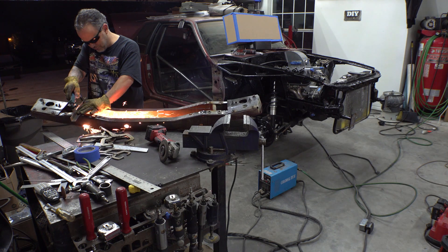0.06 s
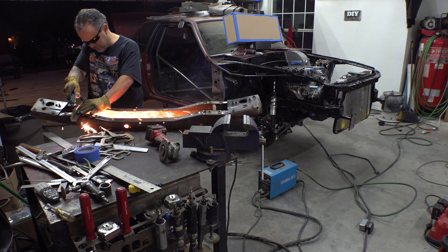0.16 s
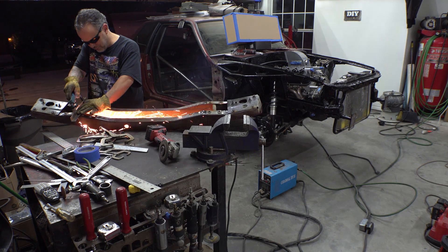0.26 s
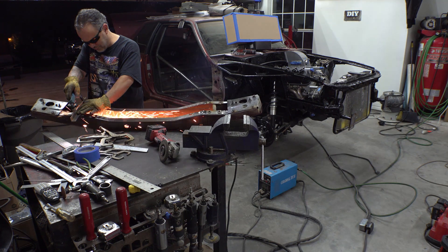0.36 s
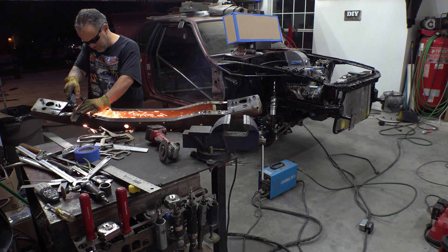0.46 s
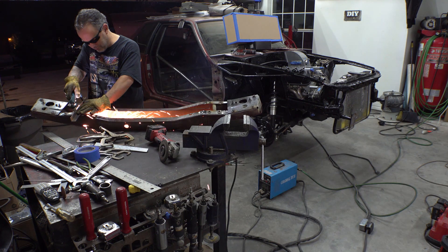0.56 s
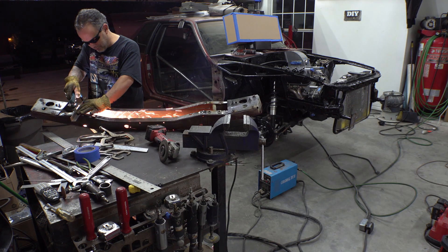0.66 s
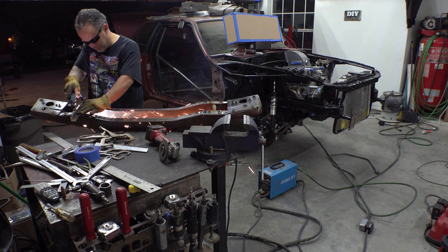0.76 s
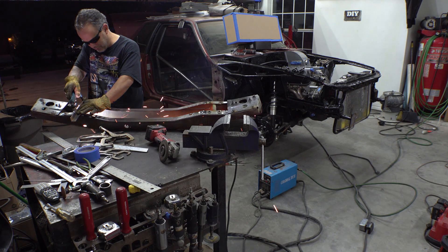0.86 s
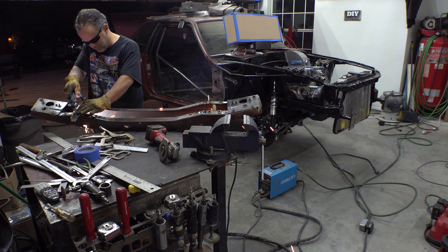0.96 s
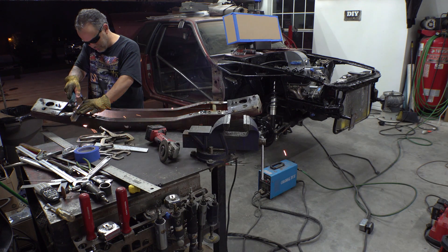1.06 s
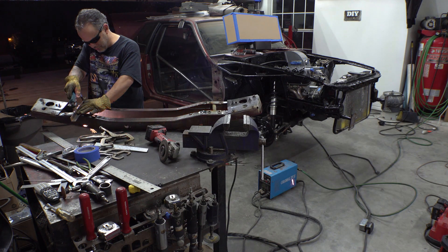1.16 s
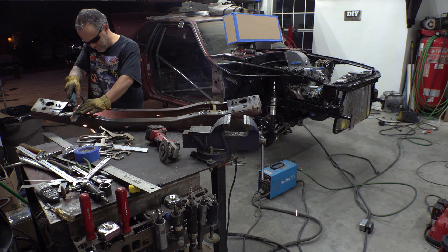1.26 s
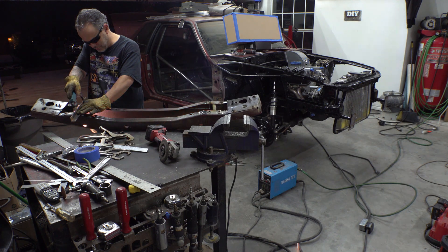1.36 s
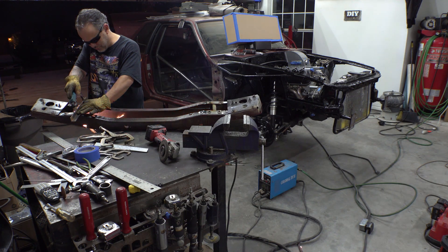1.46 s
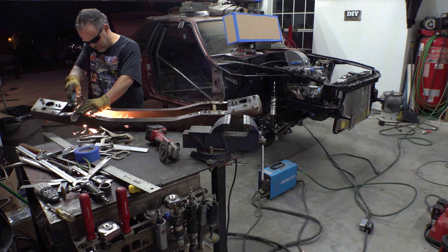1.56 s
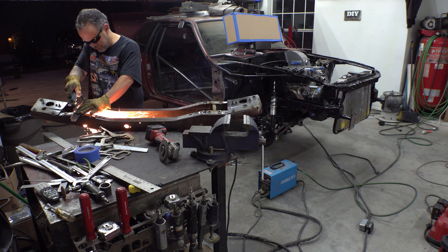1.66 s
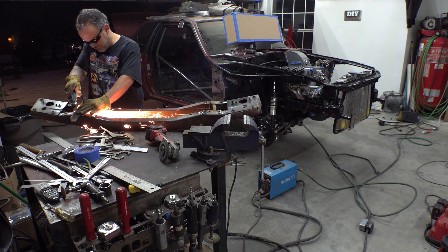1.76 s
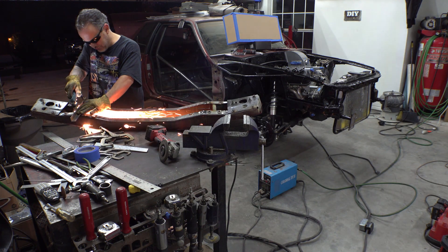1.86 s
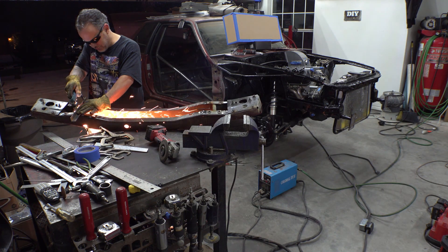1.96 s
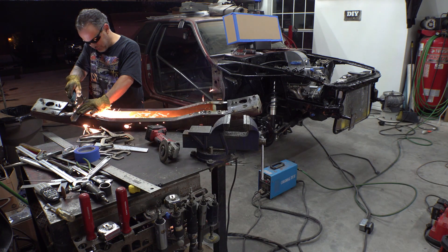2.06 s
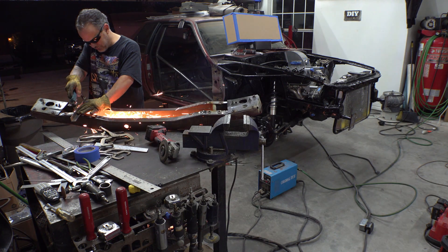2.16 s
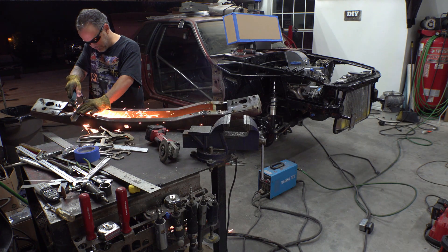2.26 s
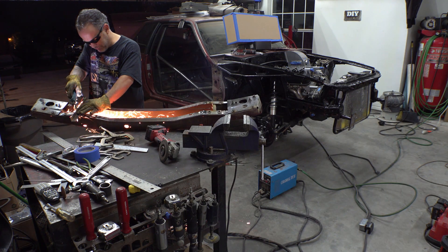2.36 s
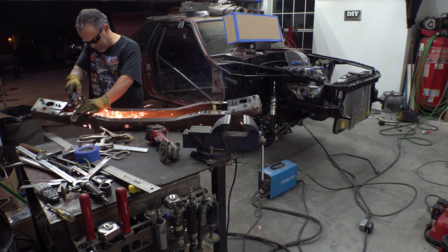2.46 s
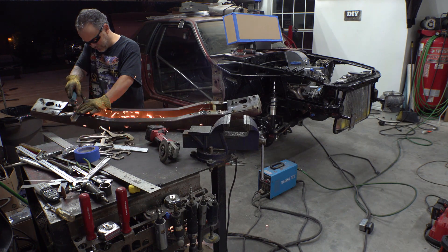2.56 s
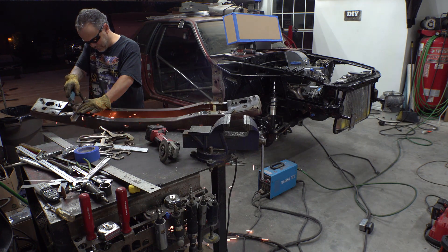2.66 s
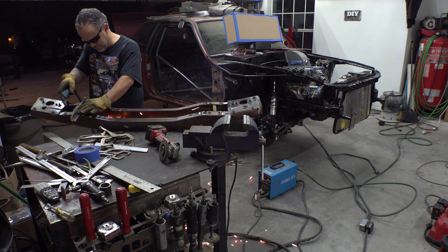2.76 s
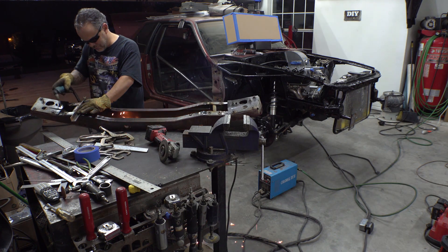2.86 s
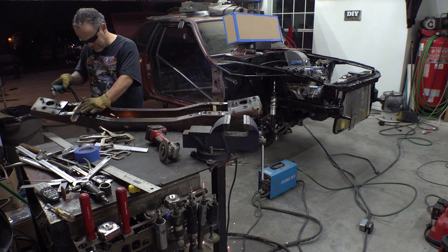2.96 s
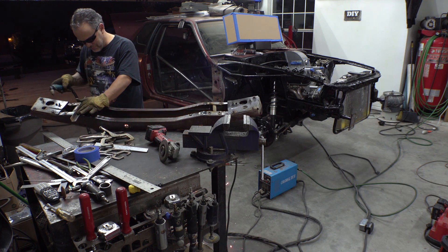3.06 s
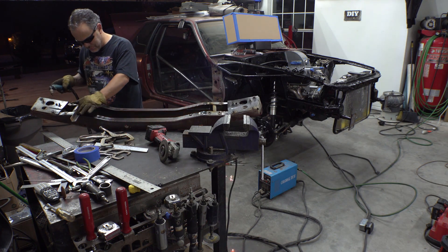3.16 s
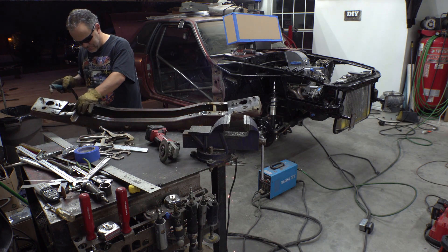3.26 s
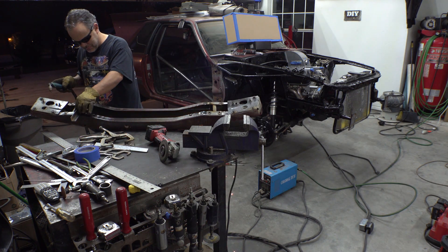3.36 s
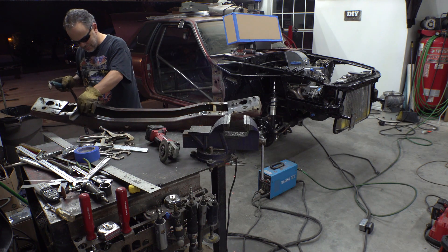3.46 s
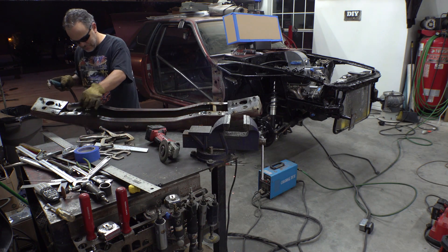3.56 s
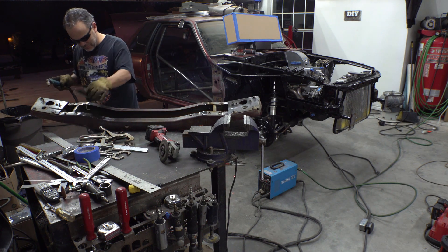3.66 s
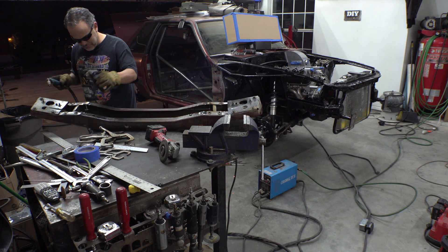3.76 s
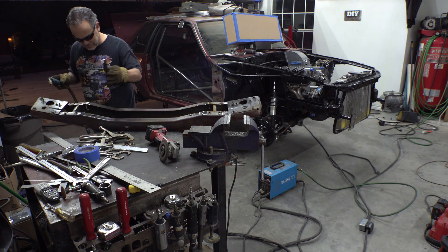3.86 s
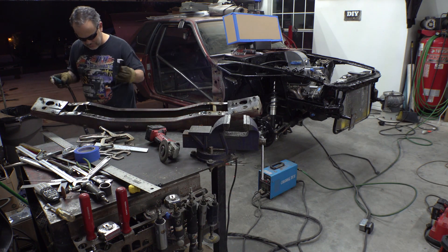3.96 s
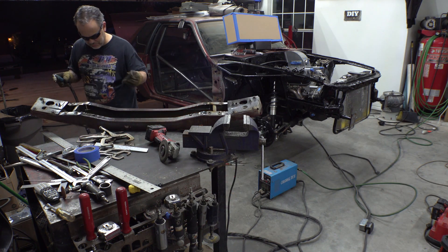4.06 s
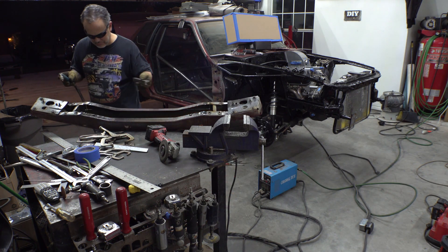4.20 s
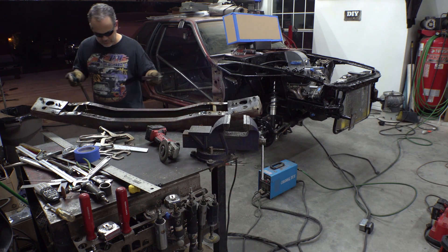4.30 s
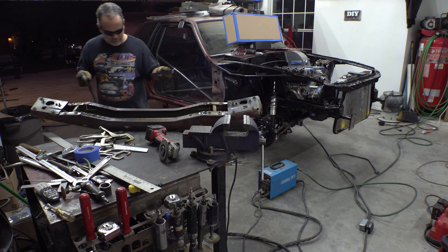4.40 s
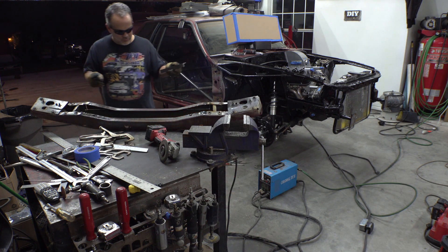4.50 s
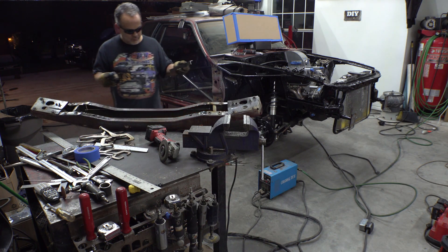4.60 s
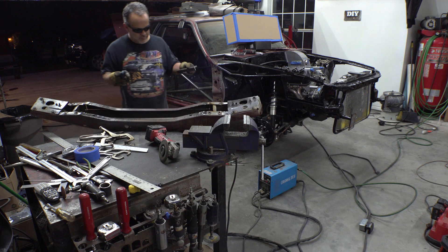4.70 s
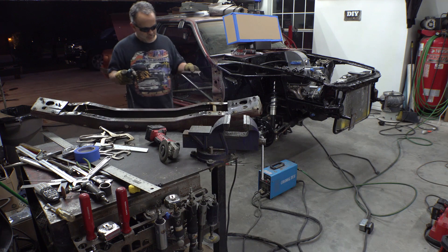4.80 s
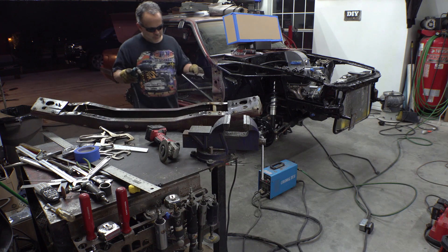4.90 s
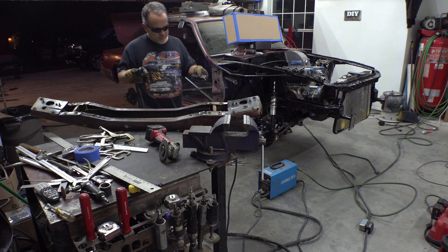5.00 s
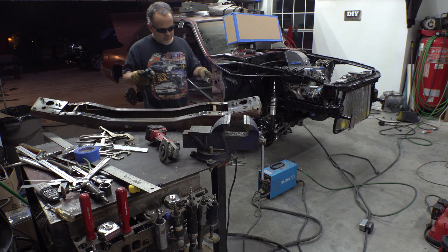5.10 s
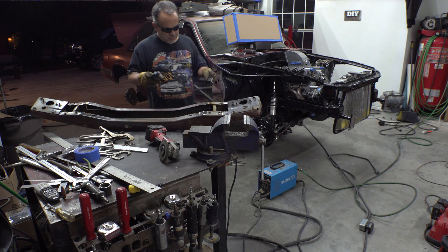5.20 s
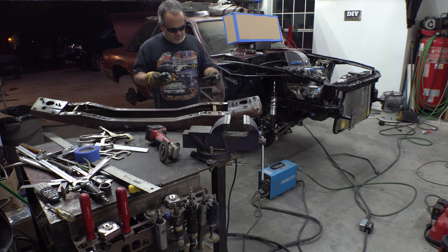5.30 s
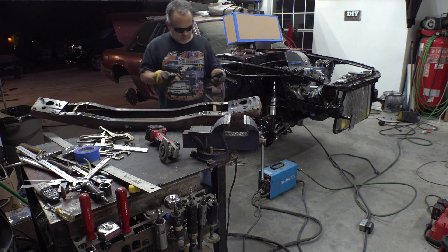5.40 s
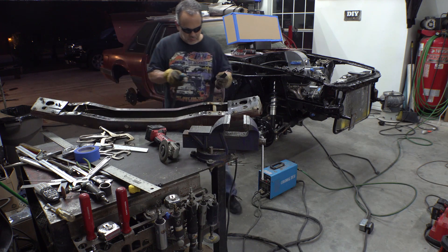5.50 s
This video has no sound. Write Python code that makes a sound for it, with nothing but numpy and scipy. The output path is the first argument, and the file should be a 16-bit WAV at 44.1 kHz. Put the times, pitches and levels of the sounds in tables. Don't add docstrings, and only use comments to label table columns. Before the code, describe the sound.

Bright, whistling hiss of a plasma cutter with sputtering slag stops dead, leaving rushing air, clinks and dragging steel in a humming garage.

```python
import sys
import numpy as np
from scipy import signal
from scipy.fft import rfft, irfft, next_fast_len
from scipy.io import wavfile
from scipy.ndimage import map_coordinates

SR = 44100
rng = np.random.default_rng(int(sys.argv[2]) if len(sys.argv) > 2 else 0)


def gain_from_db(level_db):
    decades = np.asarray(level_db, float) / 20
    return 10 ** decades


def unload_audio(sound):
    columns = np.transpose(np.atleast_2d(sound))
    steps = np.round(np.clip(columns, -1, 1) * 32767)
    wavfile.write(sys.argv[1], SR, steps.astype(np.int16))


N = 244314
ARC_OFF_S = 2.598


def seconds():
    return np.arange(N) / SR


def in_time(rows):
    s, *columns = np.transpose(rows)
    return [np.interp(seconds(), s, column) for column in columns]


def switch(on_s, fade_s):
    return np.clip((seconds() - on_s) / fade_s + 0.5, 0, 1)


def swell(at_s, rise_s, fall_s):
    late = seconds() - at_s
    return np.exp(np.minimum(late / rise_s, -late / fall_s))


def rms_one(x):
    return x / np.sqrt(np.mean(np.abs(x) ** 2) + 1e-20)


def drift(rate_hz):
    pole = np.exp(-40 * np.pi * rate_hz / SR)
    noise = rng.standard_normal(N // 20 + 3002)
    slow = signal.lfilter([1], [1, -2 * pole, pole * pole], noise)[3000:]
    return np.interp(np.arange(N) / 20, np.arange(len(slow)), rms_one(slow))


def turbulence(spectrum, patchy_db, rate, count=4):
    size = next_fast_len(N)
    points = np.array(spectrum)
    hz = np.maximum(np.arange(size // 2 + 1) * SR / size, 1)
    colour_db = np.interp(np.log(hz), np.log(points[:, 0]), points[:, 1])
    noise = irfft(rfft(rng.standard_normal(size)) * gain_from_db(colour_db), size)[:N]
    hz, s, cells = signal.stft(noise, SR, nperseg=512)
    knots = rng.standard_normal((11 * count, 400))
    knots += 0.087 * rng.standard_normal(400)
    place = np.meshgrid(count * np.log2(1 + hz / 20), 2 * rate * s, indexing="ij")
    patches = map_coordinates(knots, place, order=2, mode="mirror")
    return rms_one(signal.istft(cells * gain_from_db(patchy_db * patches), SR, nperseg=512)[1][:N])


def resonate(x, hz, width_hz):
    r = np.exp(-np.pi * width_hz / SR)
    passing = np.array([1, 0, -1]) * (1 - r * r) / 2
    return signal.lfilter(passing, [1, -2 * r * np.cos(2 * np.pi * hz / SR), r * r], x)


def whistle(hz, level_db, width_hz):
    pole = np.exp(-np.pi * width_hz / SR)
    noise = [1, 1j] @ rng.standard_normal((2, len(hz)))
    flutter = signal.lfilter([1], [1, -2 * pole, pole * pole], noise)
    turning = np.exp(2j * np.pi * np.cumsum(hz) / SR)
    return gain_from_db(level_db) * rms_one(np.real(flutter * turning))


# start_s, jet level_db, lift off the steel [0-1], edge tone level_db, pitch shift [%]
TORCH = [
    (0.0, -28, 0.2, -46, -0.2),
    (0.58, -29, 0, -32, -1.3),
    (0.82, -28, .8, -31.5, 1.2),
    (1.05, -29.5, .95, -29, 0.1),
    (1.16, -30.5, 0.03, -30.5, 0.9),
    (1.62, -31, 0.05, -28, -2),
    (1.95, -31, 0.05, -26, 4),
    (2.22, -30, 0.01, -27.5, 1.5),
    (2.6, -29.5, .02, -34, -3.0),
]
# pitch_hz, rise at full lift [Hz], change at full lift [dB], width_hz, level_db
EDGE_TONES = [
    (7520, 260, -2, 330, -6),
    (9780, 570, 10.5, 510, -5),
]
SHIFT_SHARES = (.7, 1.3)
# pitch_hz, level [dB per Hz]
HISS_BODY = [(1410, -19), (2400, -15.5), (3310, -9), (4440, -5.5), (6810, -2.5), (7610, 1), (10300, -2),
             (11500, -8.5), (15000, -22), (22000, -120)]
# pitch_hz, level [dB per Hz]
HISS_TOP = [(6470, -15), (11000, -5.5), (12000, -5.5), (14900, -7.5), (15700, -15.5)]


def arc():
    jet_db, lift, edge_db, shift = in_time(TORCH)
    body_db = jet_db - 6 * lift
    top_db = -4.5 + 1.3 * seconds() - 1.5 * lift
    hiss = gain_from_db(body_db + 6.5) * turbulence(HISS_BODY, patchy_db=0.94, rate=2.52, count=12)
    hiss += gain_from_db(body_db + top_db + 2.2) * turbulence(HISS_TOP, patchy_db=1.5, rate=2.73, count=16)
    locked = np.tanh(3.0 * lift)
    tones = 0
    for (hz, rise_hz, lift_db, width_hz, db), share in zip(EDGE_TONES, SHIFT_SHARES):
        pitch_hz = hz * (1 + share * shift / 100) + rise_hz * locked + 40 * drift(4.4)
        level_db = edge_db + db + lift_db * locked + 0.9 * drift(8.0)
        tones = tones + whistle(pitch_hz, level_db, width_hz)
    ripple_hz = 123
    turn = 2 * np.pi * ripple_hz * seconds()
    ripple = 1 + 0.05 * np.sin(turn) + 0.035 * np.sin(2 * turn + 1.1)
    return (hiss + tones) * ripple * (1 - switch(ARC_OFF_S, 0.0055))


# start_s, length_s, pitch_hz, level_db
PASSING_TONES = [(0.0, 0.19, 6400, -36), (0.022, .32, 13200, -37), (0.148, 0.44, 7270, -37),
                 (0.101, 0.48, 6200, -37), (0.373, 0.51, 11450, -35), (0.543, 0.28, 5000, -36.5),
                 (.76, 0.32, 9700, -29.5), (0.804, 0.16, 7950, -31), (.8, .2, 8770, -31),
                 (.5, .3, 12700, -39), (1.098, 0.23, 3820, -36.5), (1.446, 0.28, 8700, -33),
                 (1.55, .35, 9350, -34), (1.796, 0.53, 11200, -36), (2.17, 0.31, 13550, -38),
                 (2.22, .5, 9440, -42), (2.253, 0.37, 11460, -34.5), (2.639, 0.099, 598, -33.5),
                 (2.89, 0.12, 800, -39.5), (2.95, .13, 9140, -36), (3.3, .46, 13200, -46),
                 (3.85, .3, 12000, -44), (3.901, 0.26, 9750, -41), (4.546, .33, 6460, -39),
                 (4.58, .24, 12750, -40), (4.623, 0.25, 8300, -37), (4.653, 0.28, 10380, -35.5),
                 (1.299, .3, 8600, -36), (4.947, 0.35, 9300, -38.5), (4.95, .31, 11250, -44)]


def streaks():
    out, size = np.zeros(N), SR * 3 // 4
    sag = 0.025
    for s, length, hz, level_db in PASSING_TONES:
        progress = np.clip(np.arange(size) / SR / length, 0, 1)
        fade = np.clip(9.0 * np.minimum(progress, 1 - progress), 0, 1)
        tone = whistle(hz * (1 - sag * progress), level_db, width_hz=360 + 0.01 * hz)
        at = round(s * SR)
        out[at:at + size] += (fade * tone)[:N - at]
    return out


# peak_s, level_db
SLAG_BURSTS = [(0.23, 4.5), (0.55, 2.5), (0.73, 4), (1.18, 1.2), (1.55, 1), (1.72, 4.5), (1.95, 3.5),
               (2.05, 3), (2.26, 3.5), (2.41, 5), (2.6, 7.5), (2.7, 5.5)]
# level_db, share of lift loss, share of sputters,
# change late in the cut [dB per s], loss without the arc [dB per s]
BOOM = [
    (-36.5, 0.85, 1.3, -2.2, -2),
    (-39.5, 0.41, .45, -0.3, 56),
    (-33, 0.71, 0.22, -5.5, 23),
]
# pitch_hz, width_hz, level_db
AIR_INSIDE_LOW = [(418.7, 58, -0.5), (486.3, 48, 0.5), (582, 80, 0), (686, 66, -0.5), (808, 55, -2),
                  (1034, 290, -11.5)]
# pitch_hz, width_hz, level_db
AIR_INSIDE_MID = [(1408, 60, -5), (1525, 35, 8), (1500, 190, 1.5), (1789, 133, -8)]
# pitch_hz, width_hz, level_db
AIR_INSIDE_HIGH = [(2627, 67, -3.5), (2836, 105, -2.5), (3215, 200, -0.5), (3496, 70, 0.5),
                   (3780, 160, -5.5)]


def roar():
    lift = in_time(TORCH)[1]
    sputter_db = sum(db * swell(s, rise_s=0.048, fall_s=0.046) for s, db in SLAG_BURSTS)
    cooling_s = np.maximum(seconds() - ARC_OFF_S, 0)
    late_s = np.maximum(seconds() - 1.04, 0)
    out = 0
    for group, settings in zip((AIR_INSIDE_LOW, AIR_INSIDE_MID, AIR_INSIDE_HIGH), BOOM):
        mean_db, lifted, sputtered, fade, dying = settings
        level_db = mean_db - 5 * lifted * lift + sputtered * sputter_db + fade * late_s - dying * cooling_s
        jet = rng.standard_normal(N) * gain_from_db(1.9 * drift(31.0))
        voiced = 0
        for k, (hz, width_hz, db) in enumerate(group):
            band = resonate(resonate(jet, hz, 1.48 * width_hz), hz, 1.48 * width_hz)
            voiced = voiced + gain_from_db(db) * band * (-1) ** k
        out = out + gain_from_db(level_db) * rms_one(voiced)
    return out * (1 - switch(2.76, 0.064))


# pitch_hz, level [dB per Hz]
FAN_HUM = [(65, -47), (110, -16.5), (236, -7), (264, -8.5), (339, 1.5), (374, -6), (592, -9.5), (713, -14),
           (1500, -20), (1950, -40), (3300, -120)]
# pitch_hz, level [dB per Hz]
LOW_RUMBLE = [(12, -30), (20, -16), (59, -2), (86, -9), (120, -2.5), (160, -23), (260, -120)]


def floor():
    off = switch(ARC_OFF_S + 0.15, 0.11)
    held = off * swell(ARC_OFF_S + 0.44, 1.5, 0.5)
    thump_db = 9.5 * swell(ARC_OFF_S + 0.01, 0.052, 0.094)
    jet_db = -4.5 * in_time(TORCH)[1] * (1 - off) + thump_db
    hum_db = -55.5 * (1 - off) - 57 * off - 10 * held + jet_db
    rumble_db = -77.5 * (1 - off) - 71 * off - 8.5 * held + jet_db
    hum = gain_from_db(hum_db + 3.5) * turbulence(FAN_HUM, patchy_db=-1.0, rate=3.3, count=2)
    return hum + gain_from_db(rumble_db + 2.2) * turbulence(LOW_RUMBLE, patchy_db=2.0, rate=3.0, count=1)


# start_s, peak level_db, brightness_hz, crack length [ms], ring against crack [dB]
HITS = [(1.634, -25, 1500, 4.4, -28), (2.041, -33, 1200, 3.5, -27.5), (2.597, -22, 936, 0.62, -38),
        (2.93, -30, 1100, 6.5, -22), (3.006, -26, 1900, 16, -15), (3.06, -29, 1500, 6.0, -21),
        (3.13, -40, 1500, 5.2, -24), (3.409, -38, 1300, 8.0, -17), (3.53, -36, 1500, 6.0, -15.5),
        (3.6, -32, 700, 6.0, -11.5), (5.05, -32.5, 1970, 12.0, -26), (5.493, -38, 450, 3.2, -30),
        (5.504, -35, 2300, 39, -44)]
# pitch_hz, level_db, time to die by 60 dB [s]
RAIL_TONES = [(480, -17, 0.6), (897, 5.5, 1.05), (1100, -13, 0.45), (1220, -3, 0.55), (1504, 7.5, 0.37),
              (1740, 0, 0.54), (2660, 2, .5), (3120, -8.0, .6), (3784, -7.0, .5)]


def knocks():
    out = np.zeros(N)
    spread_db = rng.normal(0, 1, (len(HITS), len(RAIL_TONES)))
    t = np.arange(SR // 2) / SR
    for (s, peak_db, bright_hz, crack_ms, ring_db), luck_db in zip(HITS, spread_db):
        burst = rng.standard_normal(len(t)) * np.exp(-1000 * t / crack_ms)
        width_hz = 0.56 * bright_hz
        crack = resonate(resonate(burst, bright_hz, width_hz), bright_hz, width_hz)
        hit = crack / np.max(np.abs(crack))
        for (hz, level_db, t60_s), chance_db in zip(RAIL_TONES, luck_db):
            reach = 1 / (1 + (hz / bright_hz) ** 2)
            dying = gain_from_db(ring_db + level_db + chance_db - 60 * t / t60_s)
            hit += dying * reach * np.sin(2 * np.pi * hz * t)
        at = round(s * SR)
        out[at:at + len(t)] += (gain_from_db(peak_db) * hit)[:N - at]
    return out


# start_s, level_db
COOLING_AIR = [
    (2.6, -32),
    (2.86, -35),
    (3.28, -35.5),
    (4.0, -32),
    (4.56, -30),
    (4.74, -29.5),
    (5.1, -29),
    (5.3, -36),
    (5.49, -46),
]
# peak_s, lower part level_db, fall_s
AIR_PUFFS = [
    (2.76, 7.5, .04),
    (3.012, 9.5, 0.056),
    (3.13, 3.0, 0.034),
    (5.05, 3.5, .05),
    (5.515, 14.5, .2),
]
# pitch_hz, level [dB per Hz]
AIR_BRIGHT = [(2650, -30), (4500, -10), (6390, -3.5), (7130, -1), (7750, 1), (10100, 0), (14300, -7.5),
              (15700, -10.5)]
# pitch_hz, level [dB per Hz]
AIR_DULL = [(1000, -21), (1700, -10.5), (2590, -7), (2810, -6.5), (3520, -2), (5500, -3.5), (7150, -6),
            (12100, -120)]


def air():
    level_db, = in_time(COOLING_AIR)
    puff_db = sum(db * swell(s, 0.033, fall_s) for s, db, fall_s in AIR_PUFFS)
    low_db = -9.5 + 8 * swell(ARC_OFF_S, 0.01, 0.18) + puff_db
    high = gain_from_db(level_db + 0.11 * puff_db + 2.5) * turbulence(AIR_BRIGHT, patchy_db=1.5, rate=2.6, count=12)
    wide = signal.sosfiltfilt(signal.butter(2, 11700, fs=SR, output="sos"), high)
    beam = high - wide
    high = wide + beam * gain_from_db(0.18 * (level_db + 29.0))
    low = gain_from_db(level_db + low_db + 1.9) * turbulence(AIR_DULL, patchy_db=1.0, rate=1.997, count=6)
    return (high + low) * switch(ARC_OFF_S, 0.006)


# start_s, length_s, level_db, bright part against it [dB], ring [dB]
STROKES = [
    (2.733, 0.15, -38.5, -1, -12.5),
    (2.997, .1, -47, 12.5, 2),
    (3.412, 0.1, -45, 1, -17),
    (3.593, 0.044, -41.5, -6, -5),
    (3.733, 0.13, -46.5, -3, 0.5),
    (3.983, 0.15, -51.5, 2, -7),
    (4.24, 0.22, -47, -18, -20),
    (5.013, 0.092, -52, 10, -29),
    (5.51, 0.069, -55, 9, -14),
]
# pitch_hz, level [dB per Hz]
SCRAPE_DULL = [(150, -52), (250, -16.5), (476, -5.5), (779, -9.5), (870, -11.5), (1000, -17), (1300, -19),
               (2200, -120)]
# pitch_hz, level [dB per Hz]
SCRAPE_BRIGHT = [(500, -31), (850, -4), (1430, -3), (1570, -2), (2010, -13), (3000, -1), (3900, -8),
                 (6600, -120)]


def drag():
    t, low, bright, ring = seconds(), 0, 0, 0
    for s, length, level_db, bright_db, ring_db in STROKES:
        rise_db, fall_db = 194 * (t - s), 80 * (s + length - t)
        stroke = gain_from_db(level_db + np.minimum(np.minimum(rise_db, fall_db), 0))
        low = low + stroke
        bright = bright + stroke * gain_from_db(bright_db)
        ring = ring + stroke * gain_from_db(ring_db)
    grit = low * gain_from_db(-2.5) * turbulence(SCRAPE_DULL, patchy_db=1.0, rate=17.0)
    grit += bright * gain_from_db(-2.95) * turbulence(SCRAPE_BRIGHT, patchy_db=3.5, rate=15.0)
    pitch_hz = RAIL_TONES[0][0] + 16 * drift(13.4)
    tone = rms_one(np.sin(2 * np.pi * np.cumsum(pitch_hz) / SR))
    singing = ring * gain_from_db(2.3 * drift(18.0) - 2.5) * tone
    return (grit + singing) * switch(2.63, 0.15)


def garage(x):
    t60_s, echo_db = 0.31, -9.5
    t = np.arange(round(0.4 * SR)) / SR
    echoes = rng.standard_normal(len(t)) * gain_from_db(-60 * t / t60_s) * (t > 0.004)
    echoes *= gain_from_db(echo_db) / np.sqrt(np.sum(echoes ** 2))
    echoes[0] = 1
    return signal.fftconvolve(x, echoes / np.sqrt(np.sum(echoes ** 2)))[:N]


def scene():
    torch = arc() + streaks() + roar() + air()
    near = drag() + knocks() + torch * gain_from_db(0.52 * drift(12.6))
    near = signal.sosfilt(signal.butter(4, 240, "high", fs=SR, output="sos"), near)
    mono = garage(near) + floor()
    return np.array([mono, mono])


# middle_s, low_hz, high_hz
SPLIT_BANDS = [(.15, 13800, 15700), (.29, 9600, 11200), (.59, 14500, 15700), (.64, 13100, 15100),
               (.64, 5200, 6500), (1.15, 9600, 13900), (1.245, 5700, 8400), (1.245, 10300, 11900),
               (2.45, 6300, 7700), (2.845, 4700, 5800), (2.845, 13800, 15700), (3.125, 8200, 9800),
               (3.125, 12400, 13900), (3.24, 5200, 6400), (3.285, 6300, 7700), (3.33, 12400, 13900),
               (3.98, 5200, 9100), (4.12, 6900, 9100), (4.235, 4700, 6400), (4.445, 4700, 5800),
               (5.05, 7500, 9800), (5.075, 7500, 9100)]


def splits(mono):
    side, size = np.zeros(N), 2048
    hz = np.arange(size // 2 + 1) * SR / size
    for s, low_hz, high_hz in SPLIT_BANDS:
        at = round(s * SR) - size // 2
        inside = (hz > low_hz) & (hz < high_hz)
        heard = np.abs(rfft(mono[at:at + size])) * inside
        scrambled = irfft(heard * np.exp(2j * np.pi * rng.random(len(hz))), size)
        side[at:at + size] += 0.75 * scrambled * signal.windows.hann(size)
    return side


def low_pass(x):
    return signal.sosfilt(signal.butter(12, 16050, fs=SR, output="sos"), x)


def record(dry):
    cut = signal.sosfilt(signal.ellip(12, 0.3, 80, 15720, fs=SR, output="sos"), dry)
    mix = cut + splits(cut[0]) * [[1], [-1]]
    return low_pass(mix)


dry = scene()
out = record(dry)
unload_audio(out)
```